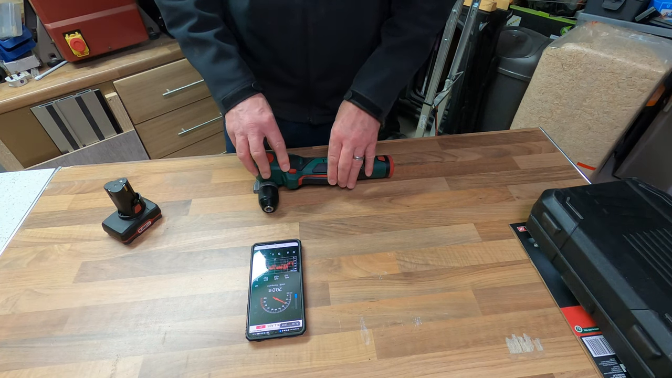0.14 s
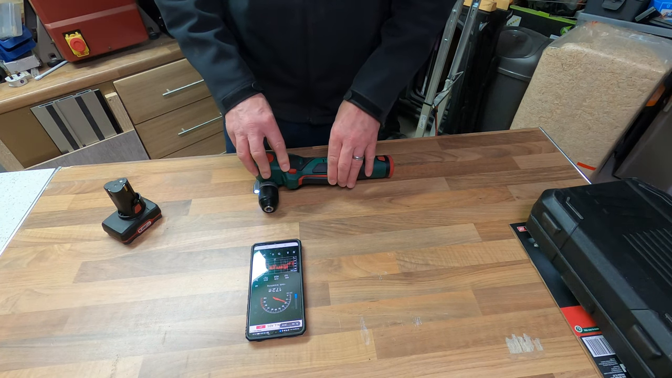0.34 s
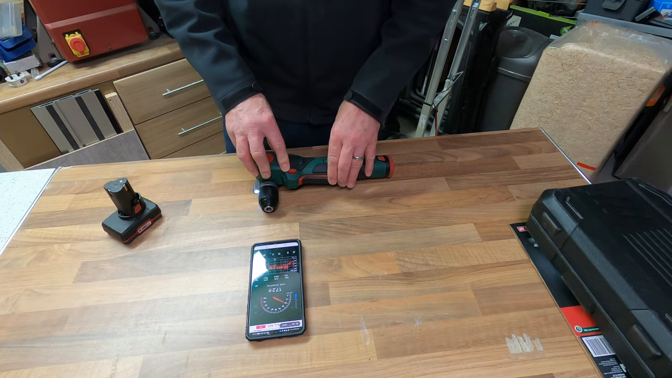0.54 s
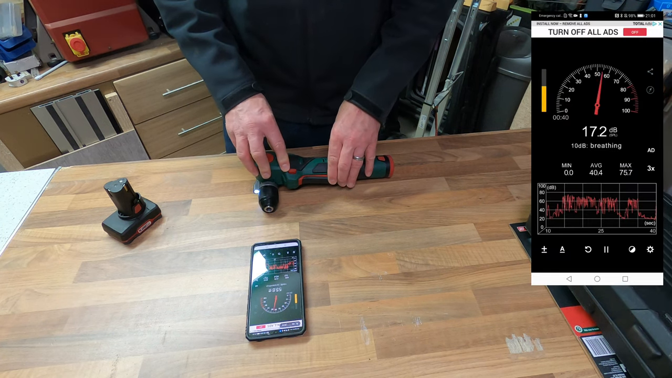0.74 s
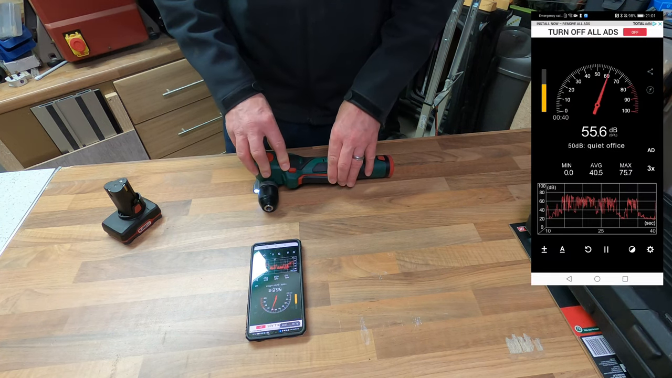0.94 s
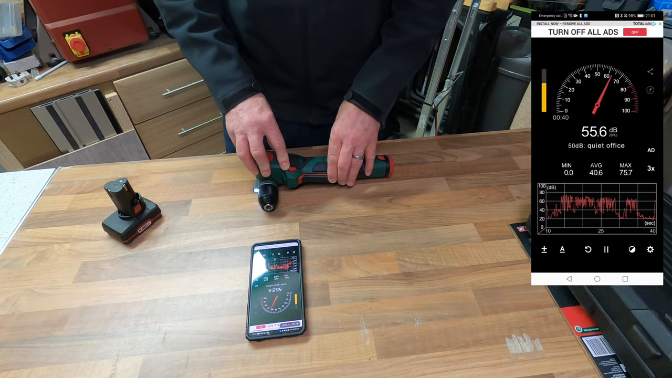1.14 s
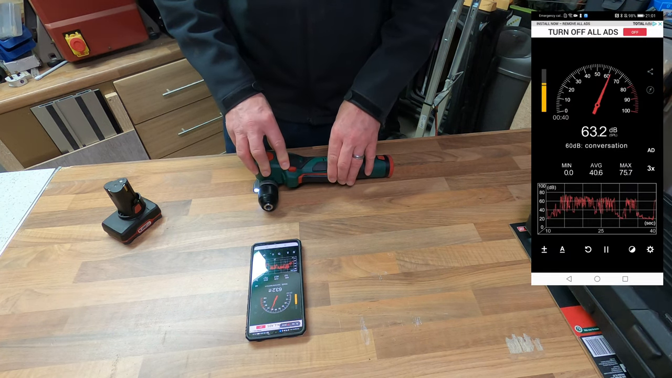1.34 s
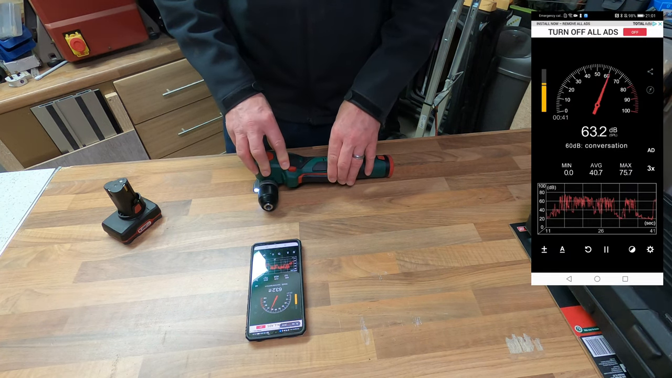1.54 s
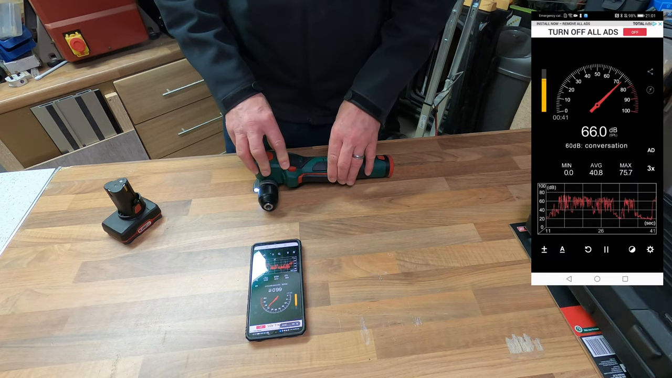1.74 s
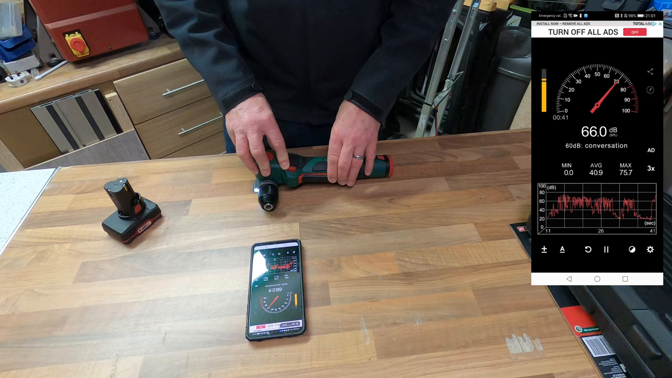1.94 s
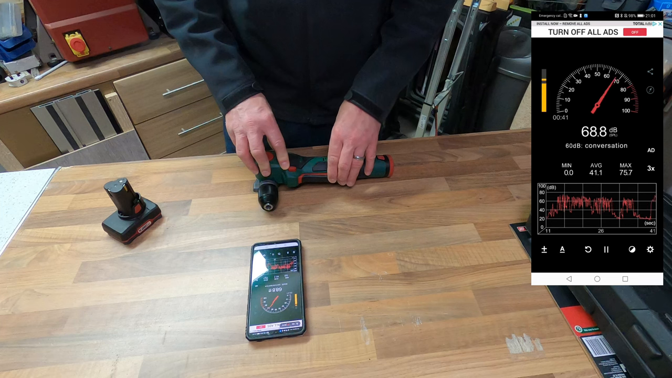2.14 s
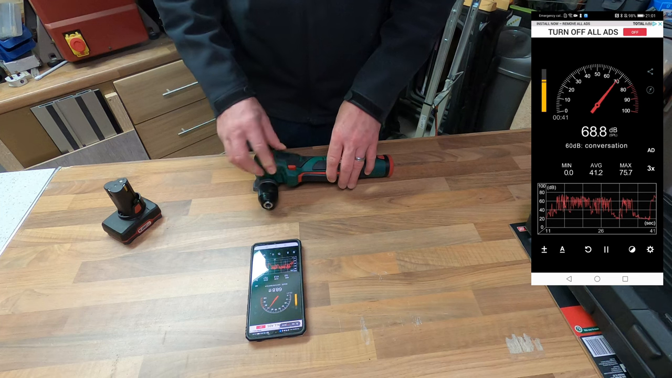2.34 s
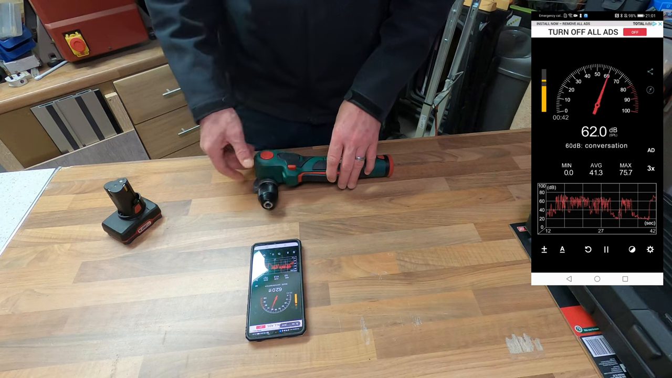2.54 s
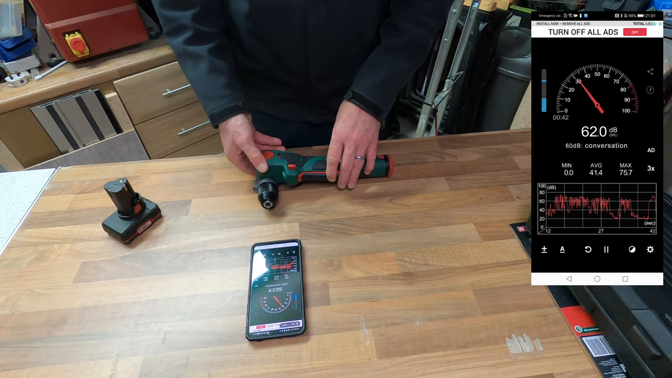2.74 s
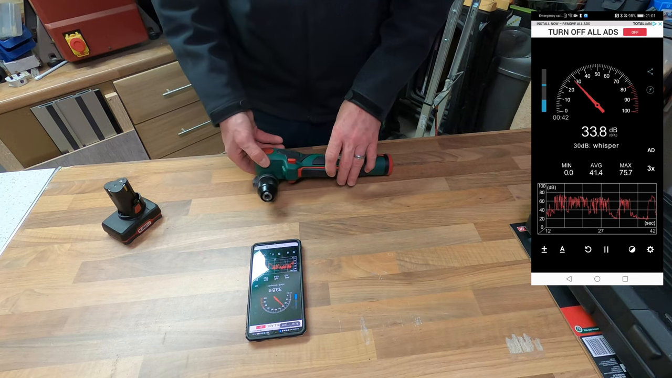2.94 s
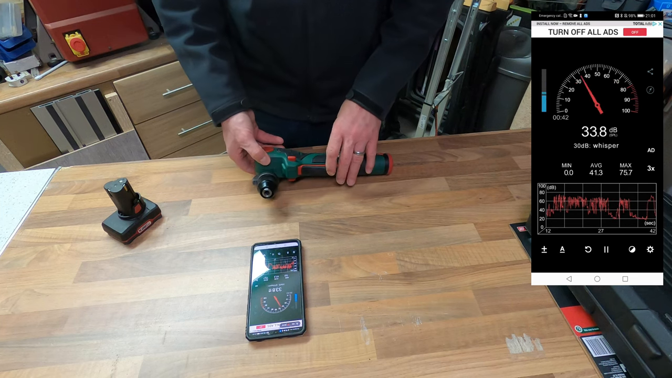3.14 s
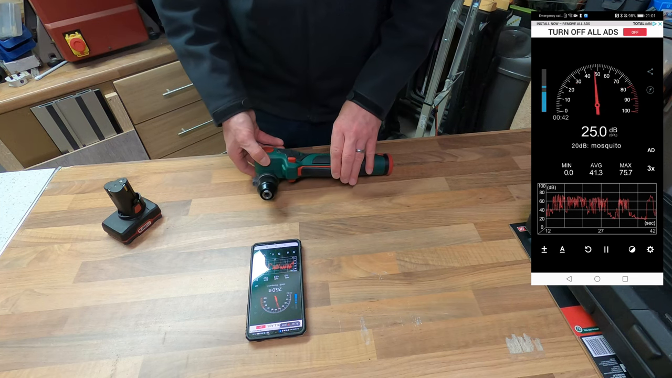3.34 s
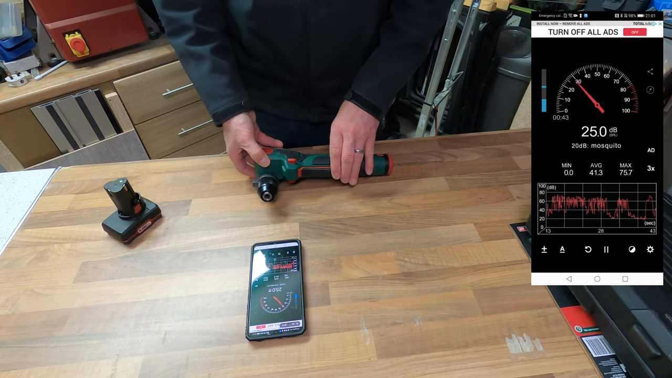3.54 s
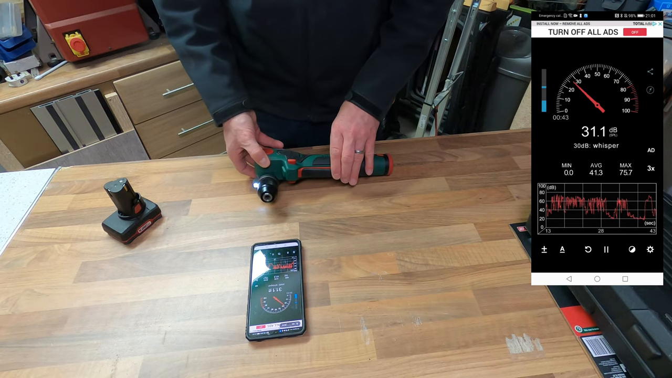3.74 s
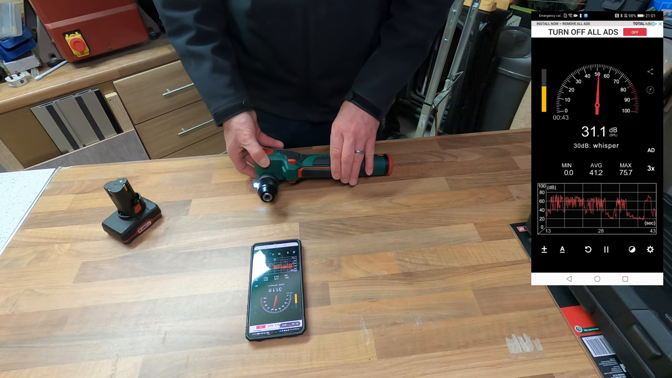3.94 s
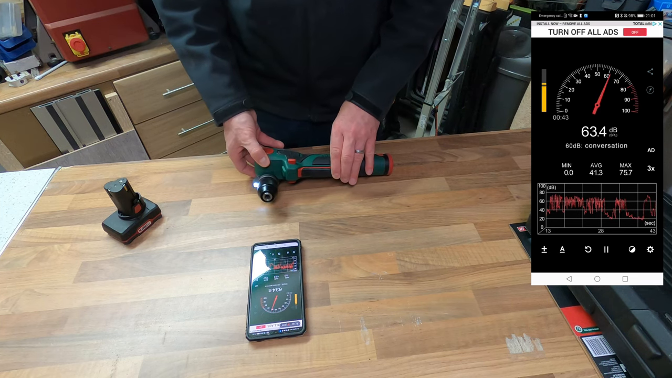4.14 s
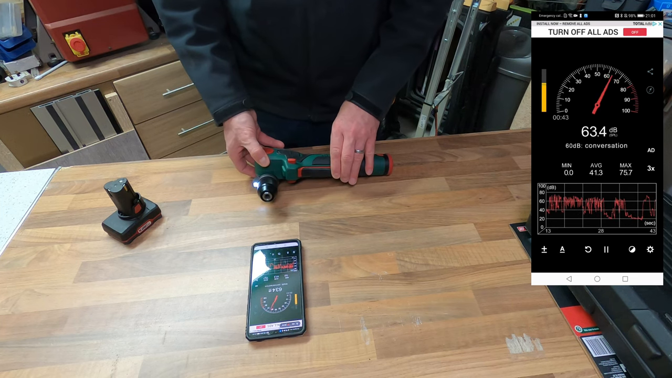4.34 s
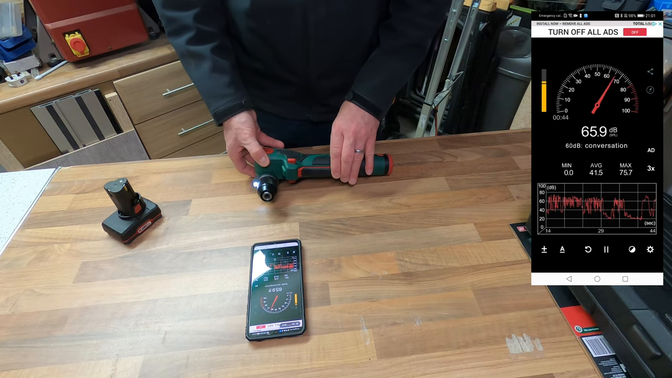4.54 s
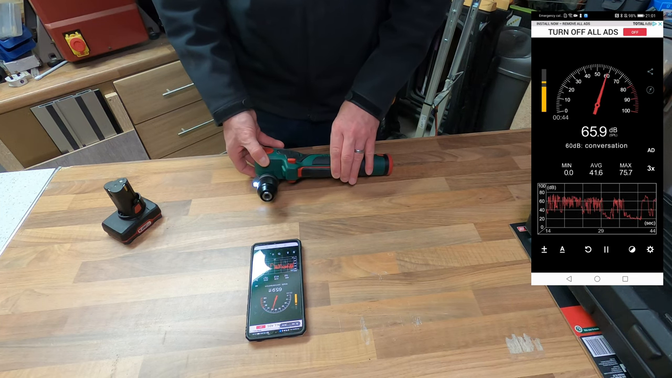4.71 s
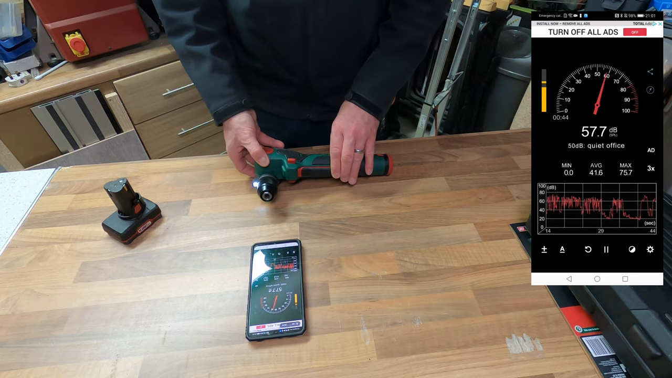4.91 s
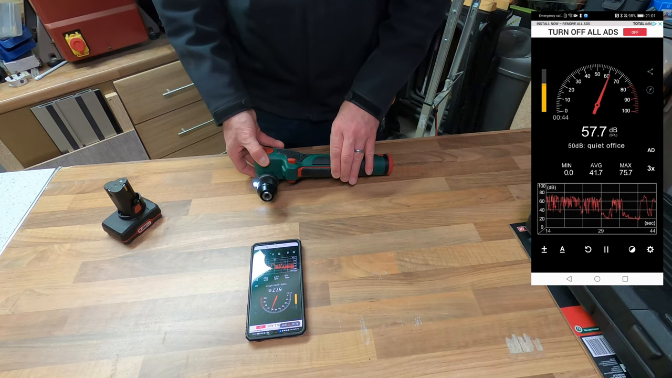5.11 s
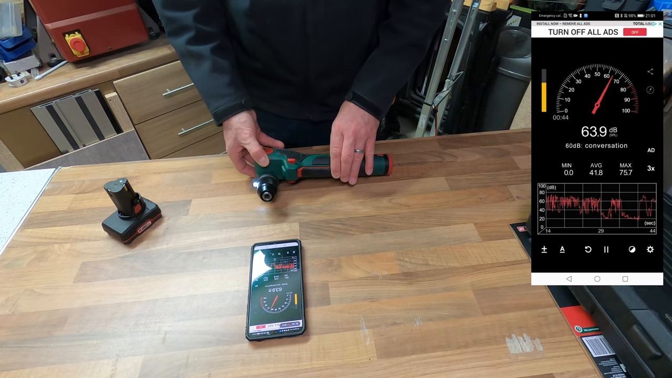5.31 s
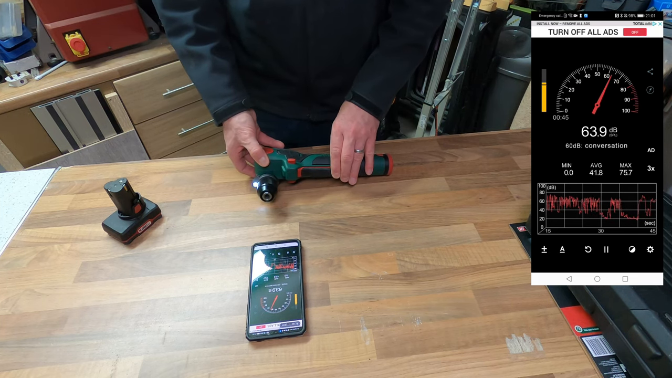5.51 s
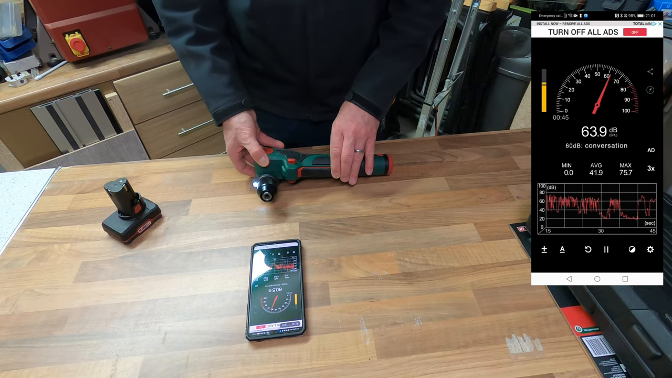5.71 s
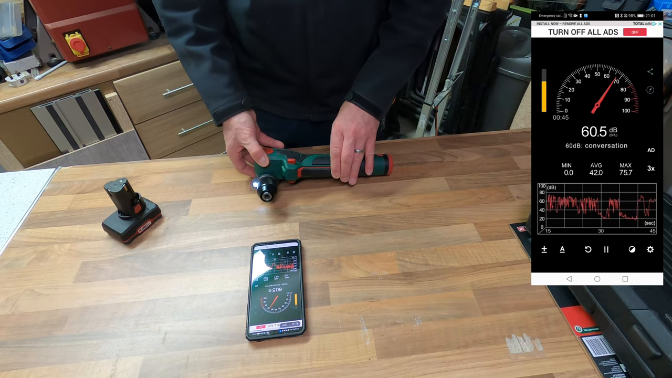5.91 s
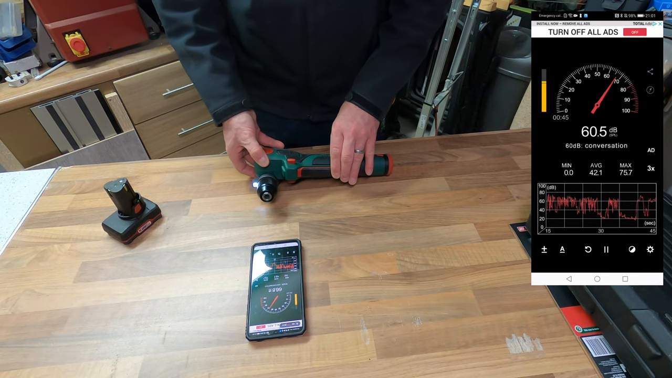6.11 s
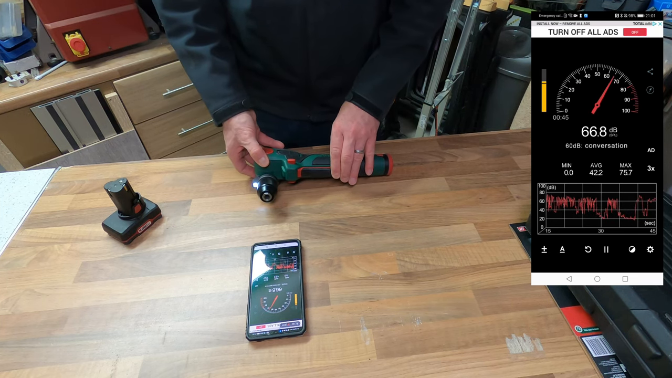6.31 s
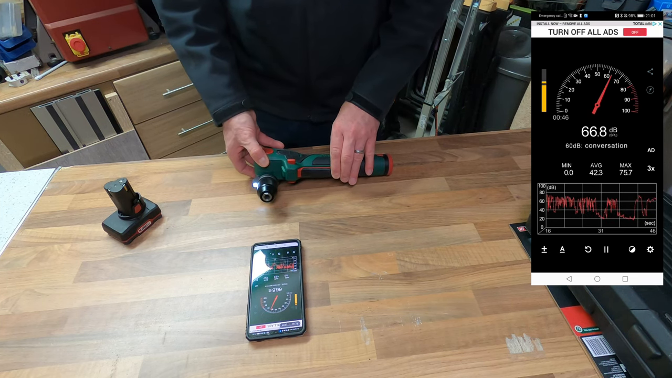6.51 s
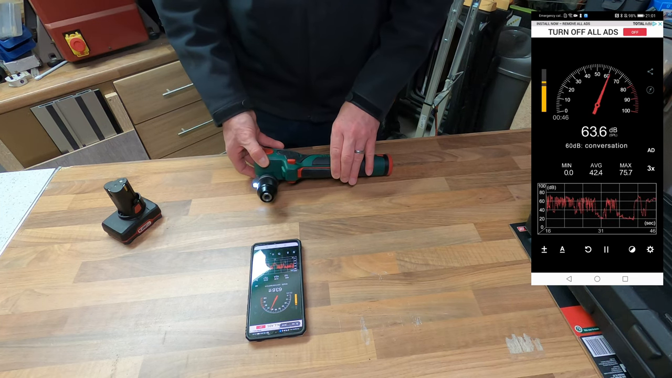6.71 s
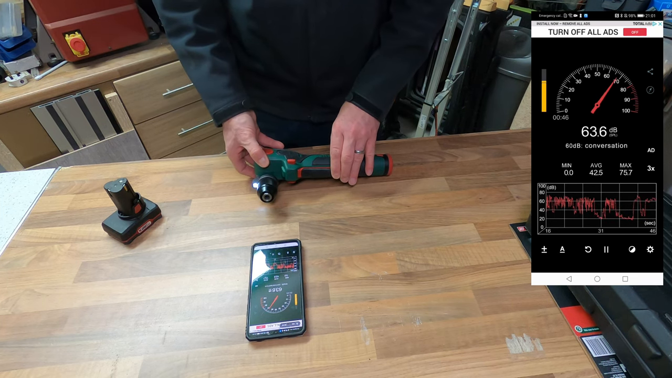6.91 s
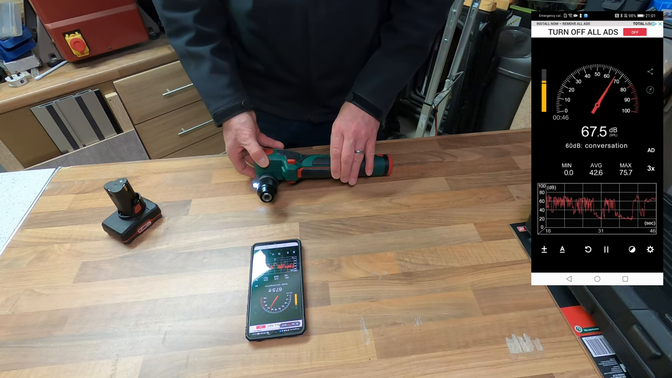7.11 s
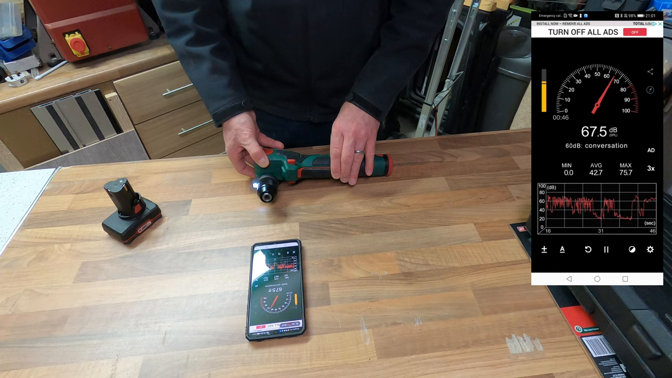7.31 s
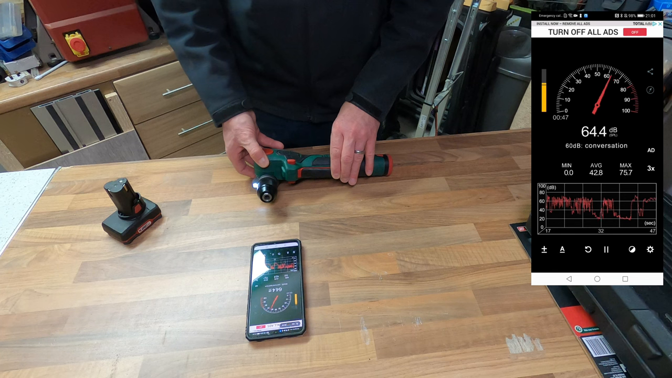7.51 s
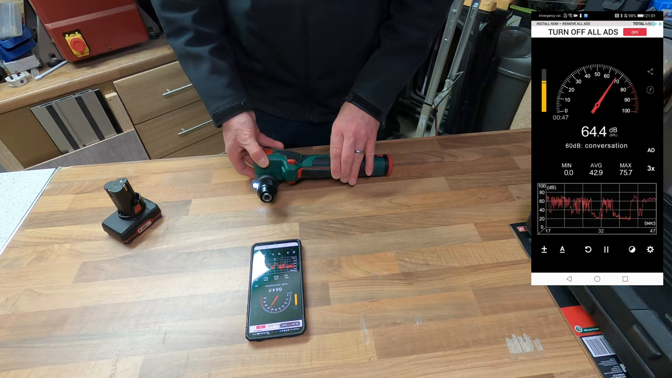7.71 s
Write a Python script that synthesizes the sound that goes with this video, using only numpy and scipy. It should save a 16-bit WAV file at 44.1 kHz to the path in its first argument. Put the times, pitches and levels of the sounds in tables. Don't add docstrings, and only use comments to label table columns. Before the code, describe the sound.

Soft switch clicks and knocks on a wooden bench frame two unloaded drill runs: a short rising burst, then a sustained bright gear whine.

```python
import sys
import numpy as np
from scipy import signal
from scipy.fft import rfft, irfft, next_fast_len
from scipy.io import wavfile
from scipy.ndimage import uniform_filter1d

SR = 44100
rng = np.random.default_rng(int(sys.argv[2]) if len(sys.argv) > 2 else 0)


def file_out(sig):
    cols = np.atleast_2d(sig).T
    lim = np.clip(cols, -1, 1)
    pcm = np.round(lim * 32767).astype(np.int16)
    wavfile.write(sys.argv[1], SR, pcm)


def volts_from_db(level):
    exponent = np.asarray(level, float) / 20
    return 10 ** exponent


N = 342216
T = np.arange(N) / SR
HZ = np.fft.rfftfreq(N, 1 / SR)


def evened(x):
    return x / np.sqrt(np.mean(x ** 2) + 1e-20)


def read(points, hz):
    f, value = np.transpose(points)
    return np.interp(np.log(hz + 1), np.log(f + 1), value)


def coloured(x, points):
    return irfft(rfft(x) * volts_from_db(read(points, HZ)), N)


def hiss():
    return rng.standard_normal(N)


def drift(rate_hz, t=T):
    knots = rng.standard_normal(int(T[-1] * rate_hz * 2) + 2)
    return np.interp(t * rate_hz * 2, np.arange(len(knots)), knots) * 1.2


def held(values, step):
    return np.repeat(values, step)[:N]


def gate(start, end, edge):
    return np.clip(np.minimum(T - start, end - T) / edge, 0, 1)


def stroke(middle, half, db):
    t = T[::64]
    level_db = db - 13.5 * ((t - middle) / half) ** 2
    return np.interp(T, t, volts_from_db(np.maximum(level_db, -150)))


def cycle(turns):
    return np.cos((2 * np.pi * (turns % 1)).astype(np.float32))


def bump_at(hz, centre, width, db):
    return db * np.exp(-((hz - centre) / width) ** 2)


# frequency in Hz, level in dB per Hz.
AIR = [(12, -35), (20, -17), (46, -12), (82, -44), (150, -8), (210, -10), (300, -15.5), (441, -23),
       (476, -24), (541, -23.5), (716, -27), (774, -22), (9000, -47), (11700, -87.5), (19800, -120)]


def air():
    common, left, right = hiss(), hiss(), hiss()
    ports = [coloured(common + .5 * left, AIR), coloured(common + .5 * right, AIR)]
    return volts_from_db(-67.5) * evened(np.array(ports))


# frequency in Hz, width in Hz, level in dB.
BENCH_MODES = [(101.6, 47, -21.5), (153.4, 44, -2.5), (183.7, 33, 3), (246.2, 16, 5), (299, 81, 3),
               (399.4, 28, 1), (461.3, 16.6, -4)]


def bench(force):
    ring = 0
    for hz, width, db in BENCH_MODES:
        offset = HZ - hz
        ring = ring + volts_from_db(db) / (1 + 2j * offset / width) / (1 + 1j * offset / (0.63 * width))
    return irfft(rfft(force) * ring * HZ ** 3 / (HZ ** 3 + 95 ** 3), N)


# start in seconds, peak in dB, pitch in Hz.
TICKS = [(0.33, -51, 980), (0.334, -50, 2000), (0.336, -55, 3900), (0.338, -54, 1300), (0.348, -60, 3000),
         (0.45, -59, 1000), (0.509, -54, 3000), (0.518, -45, 3620), (0.545, -36, 3800), (0.5455, -43, 2600),
         (0.554, -42, 3500), (0.555, -41, 1400), (0.563, -30, 3520), (0.577, -44, 2900), (0.586, -41, 3600),
         (2.514, -34, 3446), (3.744, -52, 3500), (3.7445, -55, 2000), (3.744, -56, 1000),
         (3.775, -47, 1027), (3.798, -40, 1010), (3.803, -34, 3500), (3.829, -32, 3200), (3.834, -42, 3800),
         (3.862, -30, 3700), (3.867, -40, 3900)]


def ticks():
    out, t = np.zeros(N), np.arange(800) / SR
    for s, db, hz in TICKS:
        band = signal.butter(1, [.4 * hz, 1.5 * hz + 1500], "band", fs=SR)
        snap = 1.5 * signal.lfilter(*band, rng.standard_normal(800)) * volts_from_db(-60 * t / 0.024)
        shape = volts_from_db(db - 60 * t / (0.005 + 11 / hz)) * np.minimum(t / 0.00049, 1)
        out[int(s * SR):][:800] += (0.97 * np.sin(2 * np.pi * hz * t) + snap) * shape
    return signal.lfilter(*signal.butter(4, 5200 / (SR / 2)), out)


# start in seconds, peak in dB, ring t60 in seconds.
BUMPS = [(0.329, -51, 0.13), (2.453, -27, 0.084), (2.467, -31.5, 0.087), (2.512, -37, .08),
         (2.677, -43.5, 0.26), (2.718, -45, 0.19), (3.031, -49, 0.12), (3.19, -42, 0.56),
         (3.204, -31, 0.21), (3.249, -61, 0.28), (3.357, -43.5, 0.13), (3.797, -45, 0.12)]
# frequency in Hz, level in dB.
KNOCK = [(150, -3), (195, 5.5), (245, 4), (298, -5.5), (397, -14.5)]


def bumps():
    out, t = np.zeros(N), np.arange(SR // 2) / SR
    for s, db, t60 in BUMPS:
        ring = sum(volts_from_db(d + 2.6 * drift(25, t)) * np.sin(2 * np.pi * (hz * t + rng.random())) for hz, d in KNOCK)
        shape = volts_from_db(db - 60 * t / max(t60, .03)) * np.minimum(t / 0.0091, 1)
        out[int(s * SR):][:len(t)] += 0.41 * ring * shape
    return out


# middle in seconds, half length in seconds,
# dull rub in dB, bright slide in dB, drag on the bench in dB.
HAND = [(0.848, 0.099, -40, -64, -36.5), (0.933, 0.022, -62, -80, -40), (2.525, 0.13, -60, -59.5, -47.5),
        (2.678, 0.063, -67.5, -67, -64), (2.848, 0.11, -67.5, -60.5, -92), (3.035, 0.073, -84, -74.5, -72),
        (3.218, 0.054, -68, -71, -57.5), (3.498, 0.47, -72, -74, -79), (3.804, 0.072, -66, -73, -76)]
# frequency in Hz, level in dB per Hz.
SKIN = [(290, -59), (500, -34), (533, -7), (900, -3), (1060, -3.5), (1780, -0.5), (5990, -16.5),
        (11000, -35), (14300, -69), (22000, -120)]


def rubbing():
    skin = volts_from_db(-1.0 + 1.2 * drift(53)) * evened(coloured(hiss(), SKIN))
    drag = volts_from_db(0.5 * drift(22)) * evened(bench(hiss()))
    dull = evened(signal.lfilter(*signal.butter(1, 3000, fs=SR), skin))
    bright = evened(np.gradient(skin))
    out = np.zeros(N)
    for middle, half, *levels_db in HAND:
        for db, sound in zip(levels_db, (dull, bright, drag)):
            out += stroke(middle, half, db) * sound
    return out


# start in seconds, end in seconds, tone in Hz, level in dB,
# stray tone in Hz (0 for none).
CHOPPER = [(.509, .935, 5432, -49, 13141), (.912, 1.274, 5802, -48, 12516), (1.274, 1.31, 5802, -58, 0),
           (1.272, 1.333, 6592, -48, 0), (1.333, 1.442, 5792, -50, 12516), (1.44, 1.463, 6665, -45, 0),
           (1.463, 1.6, 5620, -54, 0), (1.6, 2.13, 5620, -49.5, 0), (2.11, 2.14, 6660, -50, 0),
           (3.799, 3.88, 5431, -48, 13141), (3.88, 4.25, 5798, -53, 12516), (4.25, 4.268, 6608, -45, 0),
           (4.268, 4.318, 5795, -52, 12516), (4.318, 4.342, 6650, -45, 0), (4.342, 4.385, 5340, -47, 0),
           (4.38, 4.398, 6790, -46, 0)]


def chopper(turns):
    out = np.zeros(N)
    for start, end, hz, db, stray_hz in CHOPPER:
        span = slice(int(start * SR), int(end * SR))
        turn, kick = 2 * np.pi * hz * T[span], 2 * np.pi * turns[span]
        by_step = lambda values: np.interp(hz, [5430, 5800], values)
        tone = (1 + by_step([.45, .9]) * np.cos(kick)) * np.cos(turn + .25 * np.sin(kick))
        if stray_hz > 0:
            octave = (1 + .6 * np.cos(kick)) * np.cos(2 * turn + .6 * np.sin(kick))
            stray = np.cos(2 * np.pi * stray_hz * T[span] + .7 * np.sin(kick))
            tone += volts_from_db(by_step([-71, -70]) - db) * octave + volts_from_db(by_step([-81, -75]) - db) * stray
        level = np.sqrt(2) * volts_from_db(db + 1.0 * drift(33, T[span]))
        out[span] += level * gate(start, end, 0.00075)[span] * tone
    return out * volts_from_db(np.interp(T, [.509, .535, .545, 3.7, 3.799, 3.815], [-5, -15, 0.5, -5.5, -10, 1]))


# frequency in Hz, level in dB per Hz.
CREEP = [(260, -46.5), (450, -11.5), (487, -15), (556, -3), (1090, -11), (1200, -8), (1420, -7),
         (2170, -11), (3540, -10.5), (5120, -20), (5850, -15), (6250, -21.5), (8930, -38.5), (10600, -37),
         (13800, -67.5), (22000, -120)]
HALF = [(290, -27), (500, -10.5), (611, -14), (1250, -10.5), (1440, -6.5), (2130, -12), (2560, -6),
        (3130, -9), (3620, -1), (5250, -20), (5810, -20.5), (7520, -27.5), (8800, -20), (12600, -42.5),
        (15400, -56)]
FULL = [(260, -34), (450, -36.5), (514, -12.5), (623, -6.5), (1060, -3.5), (1300, -8), (1400, -4.5),
        (2030, -8), (3670, -4.5), (4930, -13.5), (6630, -14), (7570, -21.5), (8910, -17), (12200, -35.5),
        (13000, -42.5), (15400, -53)]


def gear_rattle(turns, blend):
    kick = (0.5 + 0.57 * blend[0]) * np.cos(2 * np.pi * turns)
    kick += 0.39 * blend[0] * np.cos(4 * np.pi * turns)
    shaft = .5 * np.cos(2 * np.pi * turns / 3)
    bunch = volts_from_db(kick + shaft + 1.0 * drift(90) + .5 * drift(10))
    knocks = volts_from_db(2.6 * np.minimum(rng.exponential(1, N), 5)) * (rng.random(N) < 1500 / SR)
    drive = bunch * hiss() * (1 + 0.5 * knocks)
    colours = zip((CREEP, HALF, FULL), blend)
    return evened(sum(evened(coloured(drive, c)) * np.sqrt(share) for c, share in colours))


# frequency in Hz, level in dB, t60 in seconds.
SHELL = [(934, 3, 0.0051), (1510, 4.5, 0.0068), (2780, -3.5, 0.02), (3460, 1, 0.0095), (3700, -1, 0.01),
         (4020, -11, 0.0081), (8700, -12.5, 0.0055)]


def jerks(turns):
    slaps = np.diff(np.floor(2 * turns + .07 * drift(40)), prepend=0).clip(0, 1)
    slaps = slaps * np.where(np.cumsum(slaps) % 2, volts_from_db(-6), 1)
    rebounds_per_kick = .4
    slaps = slaps + volts_from_db(-3) * (rng.random(N) < rebounds_per_kick * np.gradient(turns))
    t = np.arange(600) / SR
    ring = sum(volts_from_db(db - 60 * t / t60) * np.sin(2 * np.pi * hz * t) for hz, db, t60 in SHELL)
    ring = ring * np.minimum(t / .0004, 1)
    struck = signal.oaconvolve(slaps * volts_from_db(1.8 * hiss()), ring)[:N]
    return struck / np.sqrt(np.sum(ring ** 2) * 170 / SR)


# kick rate in Hz, level in dB over the rattle.
FIZZ_LEVEL = [(60, -35), (120, -19), (300, -13), (480, -18.5), (640, -9), (850, -12), (1050, -41)]
# frequency in Hz, level in dB per Hz.
FIZZ_COLOUR = [(4300, -16), (5500, 3), (6700, 9), (7600, -7), (9000, 3), (10500, -11), (12000, -2.5),
               (15500, -38)]


def brush_fizz(kick_hz, rattle_db):
    away_db = -7 * (T < RUNS[0][1])
    return volts_from_db(rattle_db + read(FIZZ_LEVEL, kick_hz) + away_db) * evened(coloured(hiss(), FIZZ_COLOUR))


ORDERS = [2, 2.522, 4, 5, 7, 8, 9.93, 10.25, 12, 13, 15, 17, 18, 21, 23, 24, 30, 31, 32, 33, 33.95, 34.9,
          36.97, 37.9, 39, 40, 41, 40.5, 42]
# dB over the rattle per Hz at half speed, the same flat out.
ORDERS_DB = [(10.8, 9.7), (6.5, 8), (10.8, 10), (12, 9.1), (15.5, 10), (9.3, 9.5), (8, 13), (21, 9),
             (18, 10), (12, 14), (15, 23), (10.5, 12), (10.5, 20), (10.5, 10.5), (10.5, 14), (14, 23),
             (21, 27), (19, 12), (14, 25), (14, 29), (12, 26), (12, 26), (14, 26), (14, 23), (12, 22),
             (12, 23), (10, 23), (8, 10), (20, 22)]
# frequency in Hz, width in Hz, lift in dB.
COVER = [(6000, 130, 9), (6720, 160, 7), (2500, 160, 4)]


def gear_tones(kick_hz, turns):
    per_hz_db = -10 * np.log10(np.mean(volts_from_db(2 * read(FULL, HZ))) * SR / 2)
    shaft, shaft_hz = turns / 3, kick_hz[::64] / 3
    out = np.zeros(N)
    for order, (half_db, full_db) in zip(ORDERS, ORDERS_DB):
        low_db = min(half_db, full_db)
        law_db = np.interp(shaft_hz, [222, 250, 292, 353], [half_db, low_db - 1, low_db, full_db])
        db = read(FULL, shaft_hz * order) + law_db + per_hz_db
        db += sum(bump_at(shaft_hz * order, *mode) for mode in COVER)
        if order == 15:
            db += 2.5 * (T[::64] < 5.64)
        if order == 10.25:
            db += np.interp(shaft_hz, [165, 190], [0, -12])
        unsteady_db = 1.4 + 1.6 * (order < 14) + max(order - 30, 0) / 4
        out += held(volts_from_db(db + unsteady_db * drift(12, T[::64])), 64) * cycle(order * shaft)
    return out * np.clip(kick_hz / 400, 0, 1) ** 2


# multiple of shaft speed,
# dB over the rattle at half speed, the same flat out.
WOBBLE = [(.284, -39, -43), (.515, -20, -26.5), (.895, -8, -21.5), (1.105, -22, -25.5), (1.55, -29, -29.5),
          (.686, -18, -10.5)]
# time in seconds, level in dB.
WOBBLE_FADE = [(7.2, 0), (7.5, -4)]


def gear_wobble(kick_hz, turns):
    kick_hz, t = kick_hz[::16], T[::16]
    fade_db = np.interp(t, *np.transpose(WOBBLE_FADE))
    out = np.zeros(N)
    for order, half_db, full_db in WOBBLE:
        levels_db = [-50, half_db - 14.0, half_db, half_db, full_db]
        db = np.interp(kick_hz, [380, 434, 570, 605, 1194], levels_db)
        db += bump_at(order * kick_hz / 3, 101, 11, 10.1)
        level = held(volts_from_db(db + fade_db + 1.5 * drift(11, t)), 16)
        out += level * cycle(order * turns / 3 + .05 * drift(8.7))
    return out


# frequency in Hz, level in dB.
RADIATE = [(60, -59), (105, -41), (170, 3), (250, 7.5), (340, 8), (470, 3.5), (530, -8), (1100, -15.5)]
# frequency in Hz, width in Hz, level in dB.
SIDE_MODES = [(228, 14, -3.5), (296.3, 12, 3.5), (337, 15.4, 0.5), (449, 20, 2), (516, 25, -7),
              (707, 40, -8.5), (1010, 45, 5)]


def radiated_db(hz):
    modes = [(391.3, 11.5, -17), (405.4, 19, 9)] + SIDE_MODES
    return read(RADIATE, hz) + sum(bump_at(hz, *mode) for mode in modes)


# start in seconds, level in dB.
SWELLS = [(4.95, 6), (5.7, 8.5), (6.68, 8.5), (7.44, 8), (9, 0)]


def swell_db():
    out, rise = np.zeros(N), int(0.06 * SR)
    for s, db in SWELLS:
        age = T - s
        out = np.where(T > s, db - 3.5 * age - 8 * age ** 2, out)
    return -5 + uniform_filter1d(out, rise, origin=rise // 3)


LAW_HZ = [110, 170, 460, 640, 1000]
MULTIPLES = [1, 3, 1 / 3, 2, 4]
FORCE_DB = [(-1.1, .1, -1.1, .5, -1.5), (2.5, 0, 3.5, -8, -20.5), (-20.5, -10.5, -6, -10.5, -14),
            (-2, -17, -4, -1, -12), (-6, -15, -11, -.5, -21)]
FLUTTER_DB = [1.3, 2.0, 1.8, 2.6, 2.6]
# multiple of the kick rate, level in dB.
UPPER = [(5, -3.5), (6, -17.5), (7, -5.5), (8, -7.5), (9, -9)]
# frequency in Hz, level in dB.
UPPER_RING = [(200, -1), (450, 4), (620, -4.5), (720, -9), (1100, -25)]


def speed_law(kick_hz, values_db):
    return np.interp(np.log(kick_hz), np.log(LAW_HZ), values_db)


def kick_lines(kick_hz, rattle_db, turns, blend):
    line_db = []
    for k, force_db in zip(MULTIPLES, FORCE_DB):
        line_db.append(rattle_db + speed_law(kick_hz, force_db) + held(radiated_db(k * kick_hz[::16]), 16))
    soft_db = -4 * gate(2.36, RUNS[1][0], .07)
    line_db[0] += 2.0 * blend[2] * drift(14) * (kick_hz < 900)
    line_db[1] += soft_db + bump_at(kick_hz, 152, 19, -9)
    line_db[2] += np.clip((kick_hz - 900) / 100, 0, 1) * swell_db()
    line_db[4] += soft_db
    lines = np.zeros(N)
    for k, db, flutter in zip(MULTIPLES, line_db, FLUTTER_DB):
        lines += volts_from_db(db + flutter * drift(14)) * cycle(k * turns)
    creep = blend[0] ** 2 * volts_from_db(rattle_db + soft_db - 1.0)
    for k, db in UPPER:
        k = round(k)
        lines += creep * volts_from_db(db + read(UPPER_RING, k * kick_hz) + 2.0 * drift(14)) * cycle(k * turns)
    return np.sqrt(2) * lines * (1 + stroke(0.91, 0.028, 0))


RUMBLE_DB = [2, 5.5, -6.5, -4.5, -11.5]


def bench_rumble(kick_hz, rattle_db):
    return volts_from_db(rattle_db + speed_law(kick_hz, RUMBLE_DB)) * evened(bench(hiss()))


# start in seconds, kick rate aimed at in Hz, time constant in seconds.
TRIGGER = [(.545, 84, .15), (.92, 102, .08), (1.335, 200, .045), (1.455, 400, .07), (1.55, 463, .18),
           (2.13, 5, .5), (2.2, 5, .235), (3.79, 100, .17), (3.88, 125, .115), (4.255, 600, .5),
           (4.33, 1076, .35), (4.385, 1076, .22), (4.42, 665, .16), (4.922, 1075.8, .068),
           (6.24, 1082.6, .09)]
EFFORT_DB = [1, 1, 1.5, 2, -0.6, -2, 0, 0.5, 1.6, 1, 1, 0.5, -2, -0.15, -0.12]
# kick rate in Hz, level in dB.
RATTLE = [(31, -49), (42, -49), (52, -45.5), (105, -43.5), (300, -33.5), (450, -29), (640, -30),
          (800, -25.5), (1075, -22.5)]
# start in seconds, end in seconds.
RUNS = [
    (.535, 2.56),
    (3.815, 8),
]


def motor():
    start_hz, inertia_s, effort_s = 32, .012, .05
    hz, effort_db = np.full(N, float(start_hz)), np.zeros(N)
    for (s, aim_hz, lag), db in zip(TRIGGER, EFFORT_DB):
        at = int(s * SR)
        hz[at:] = aim_hz + (max(hz[at], start_hz) - aim_hz) * np.exp(-(T[at:] - s) / lag)
        effort_db[at:] = db
    hz = uniform_filter1d(hz, int(inertia_s * SR))
    brake_db = -260 * np.maximum(T - 2.45, 0) * (T < RUNS[1][0])
    return hz, read(RATTLE, hz) + uniform_filter1d(effort_db, int(effort_s * SR)) + brake_db


BLEND_HZ = [110, 460, 660]


def drill():
    kick_hz, rattle_db = motor()
    on = sum(gate(start, end, .02) for start, end in RUNS)
    turns = np.cumsum(kick_hz * (1 + 0.000674 * drift(30))) / SR
    blend = [np.interp(kick_hz, BLEND_HZ, row) for row in np.eye(3)]
    noise = bench_rumble(kick_hz, rattle_db) + brush_fizz(kick_hz, rattle_db)
    noise += volts_from_db(rattle_db - 2.5 - 2.5 * blend[0]) * gear_rattle(turns, blend)
    noise += volts_from_db(rattle_db - 3) * blend[0] ** 2 * jerks(turns)
    gears = np.sqrt(2) * volts_from_db(rattle_db) * (gear_tones(kick_hz, turns) + gear_wobble(kick_hz, turns))
    tones = on * (kick_lines(kick_hz, rattle_db, turns, blend) + gears) + chopper(turns)
    return on * noise, tones


# frequency in Hz, likeness from 0 to 1.
SAME = [(100, 0.985), (300, 0.98), (550, 0.9), (1640, 0.84), (4960, 0.67), (15000, 0.3)]
# frequency in Hz, left over right in dB.
LEAN = [(100, 3), (300, -0.1), (600, 1), (1200, .5), (2380, 3), (5960, 2.4), (9000, 1.5), (15000, -14)]
# frequency in Hz, lead in radians.
AHEAD = [(20, 0.11), (1000, -0.53), (3600, -0.46), (7150, -1.33), (11900, -1.3)]


def shop(noise, tones):
    size = next_fast_len(N + SR)
    t, hz = np.arange(SR // 3) / SR, np.fft.rfftfreq(size, 1 / SR)
    tails = rng.standard_normal((2, len(t))) * volts_from_db(-60 * t / .12) * (t > .002)
    tails = rfft(tails / np.linalg.norm(tails, axis=1, keepdims=True), size)
    wet = 1 - np.clip(read(SAME, hz), .05, .999)
    sides = np.array([[.5], [-.5]])
    lag = np.exp(1j * read(AHEAD, hz) * sides)
    ports = 0
    for sound, share in ((noise, wet), (tones, .3 * wet)):
        ports = ports + rfft(sound, size) * (np.sqrt(1 - share) * lag + np.sqrt(share) * tails)
    return irfft(ports * volts_from_db(read(LEAN, hz) * sides), size)[:, :N]


def scene():
    noise, tones = drill()
    handling = ticks() + bumps() + rubbing()
    return shop(noise + handling, tones) + air()


def low_pass(x):
    return signal.sosfilt(signal.butter(12, 15180, fs=SR, output="sos"), x)


def record(dry):
    return low_pass(dry)


dry = scene()
out = record(dry)
file_out(out)
```